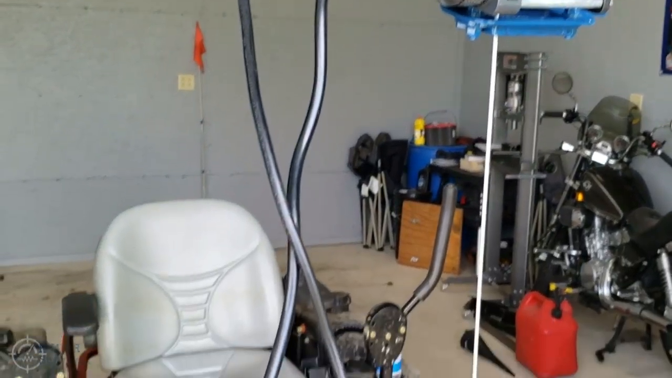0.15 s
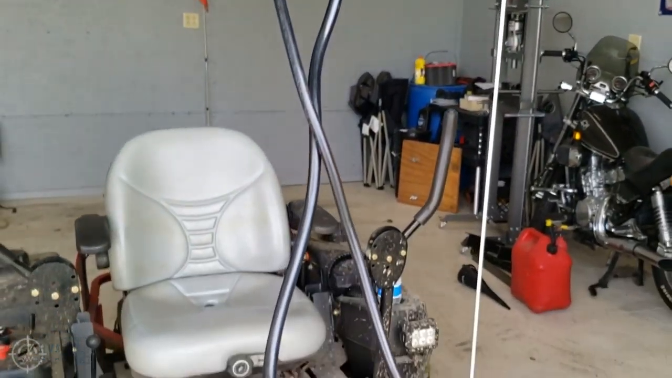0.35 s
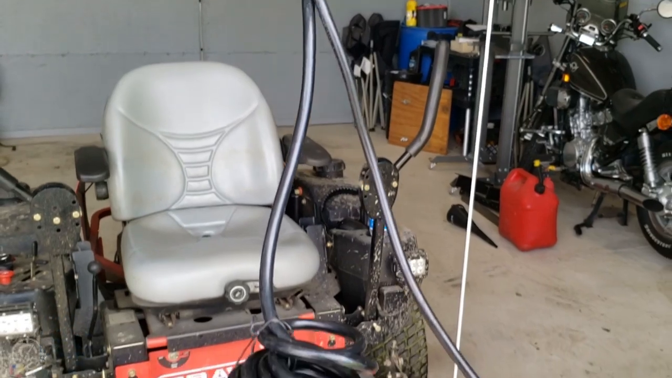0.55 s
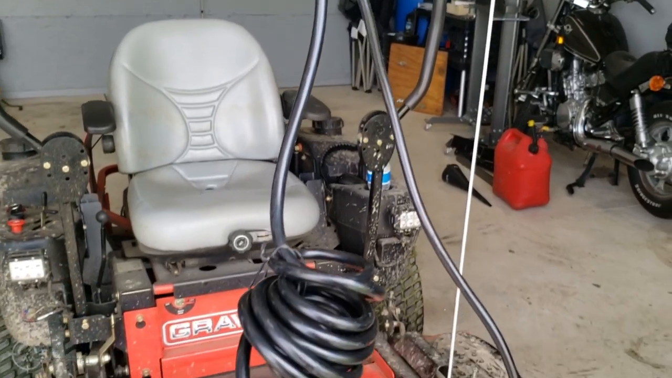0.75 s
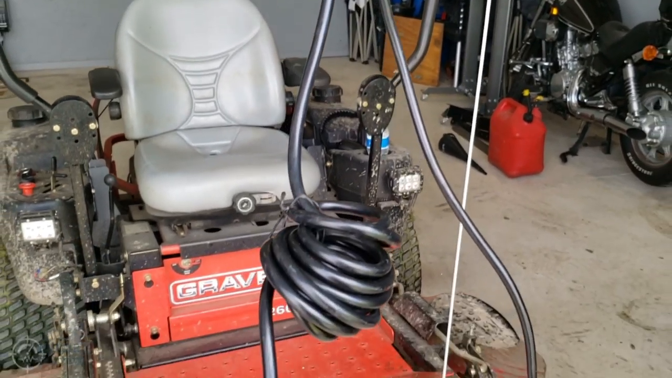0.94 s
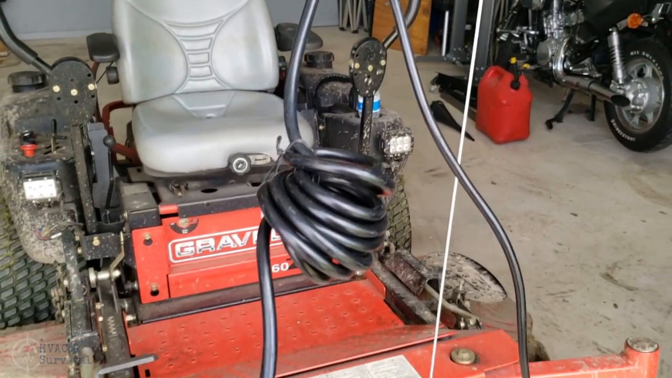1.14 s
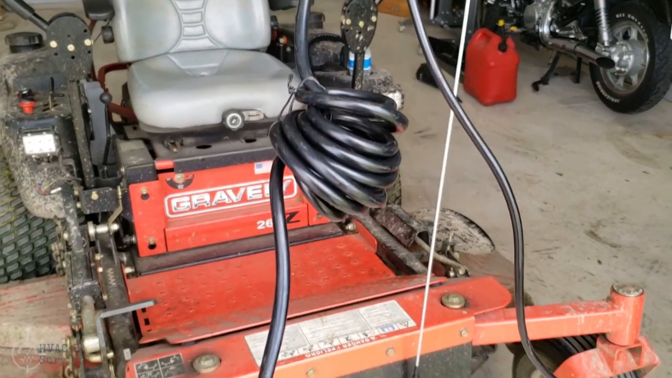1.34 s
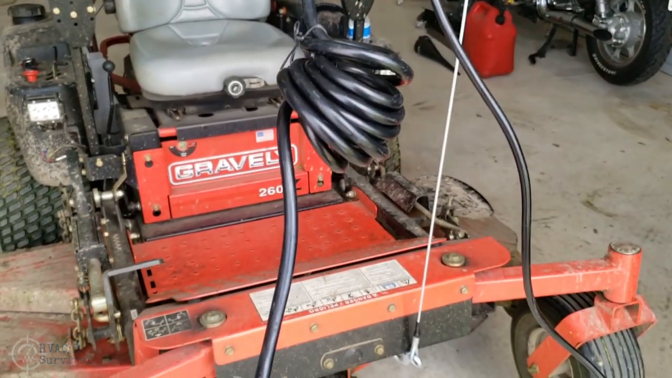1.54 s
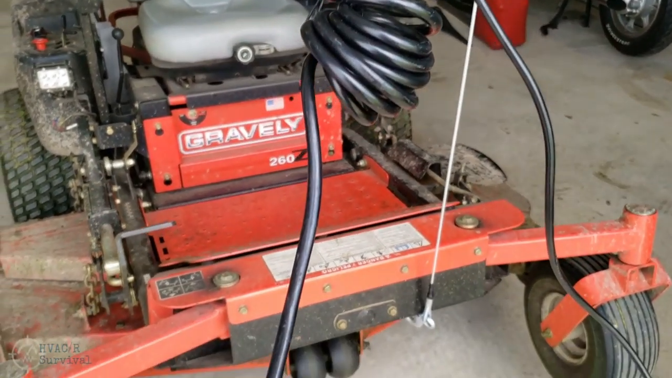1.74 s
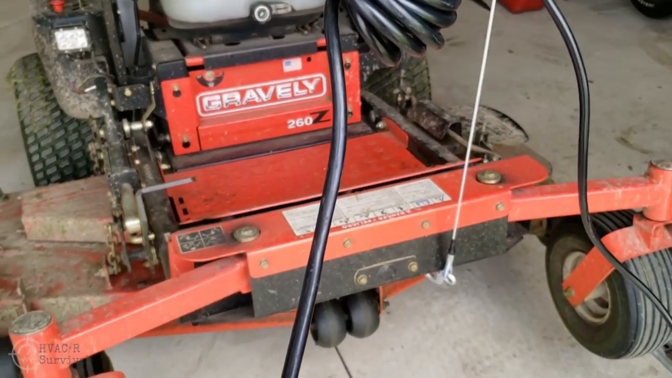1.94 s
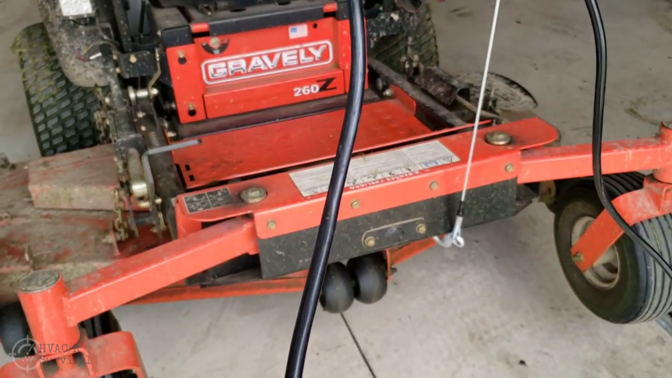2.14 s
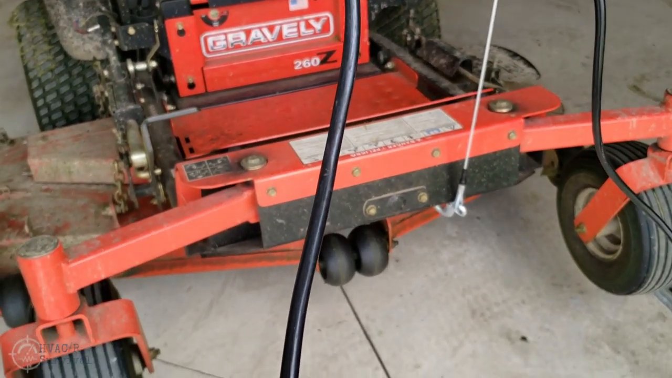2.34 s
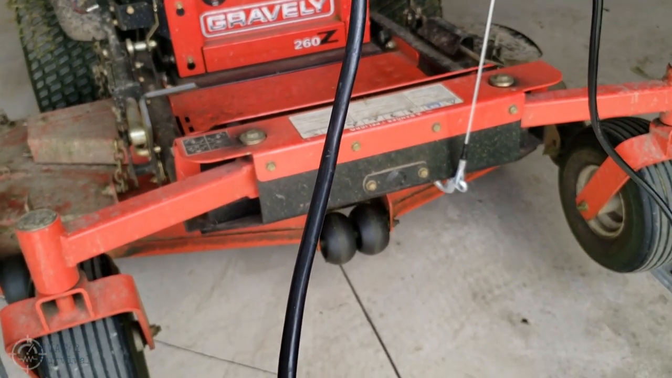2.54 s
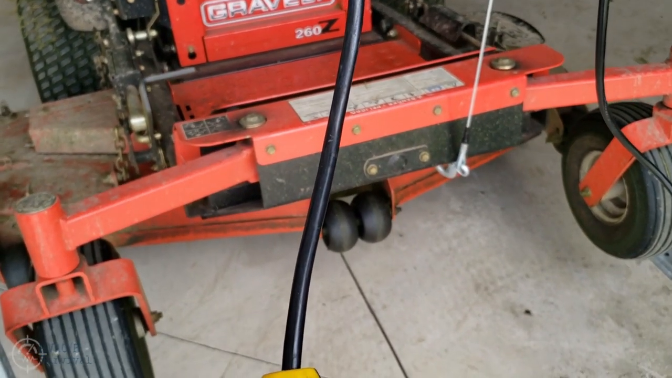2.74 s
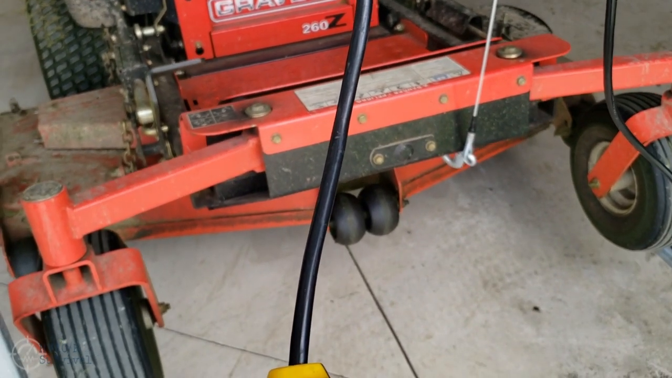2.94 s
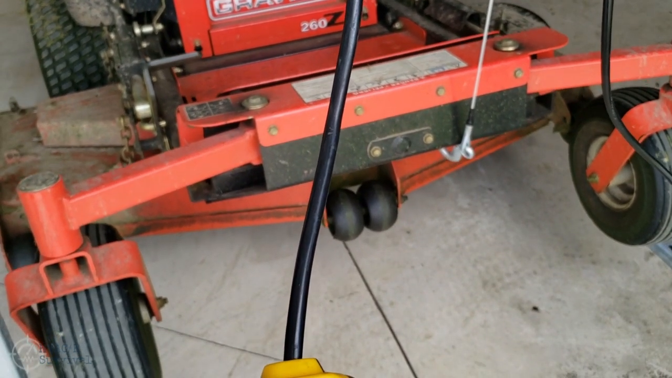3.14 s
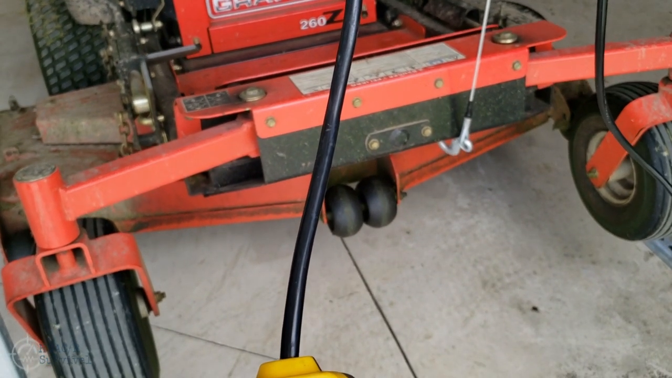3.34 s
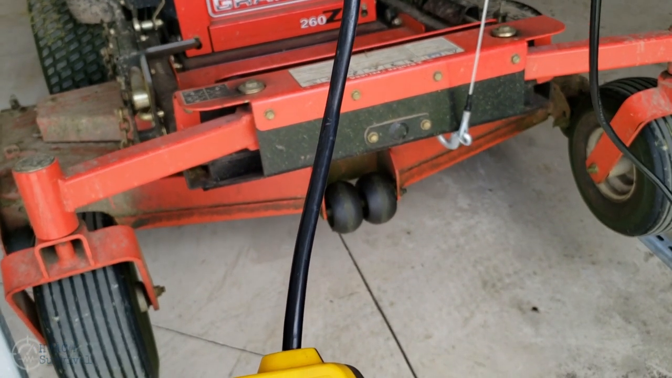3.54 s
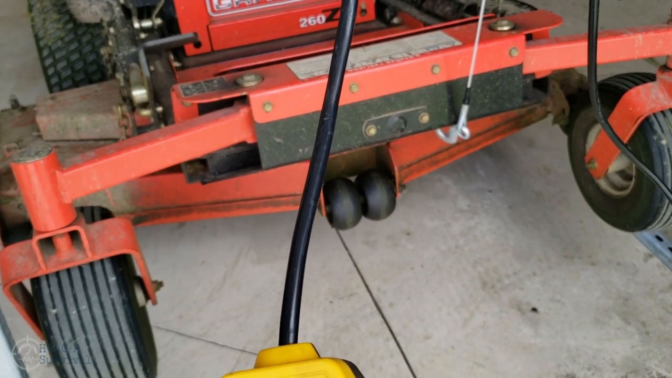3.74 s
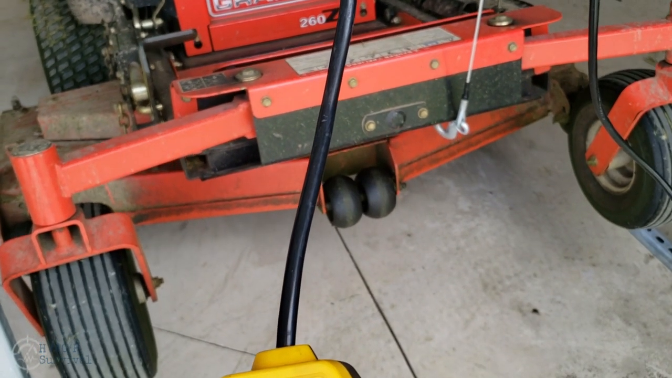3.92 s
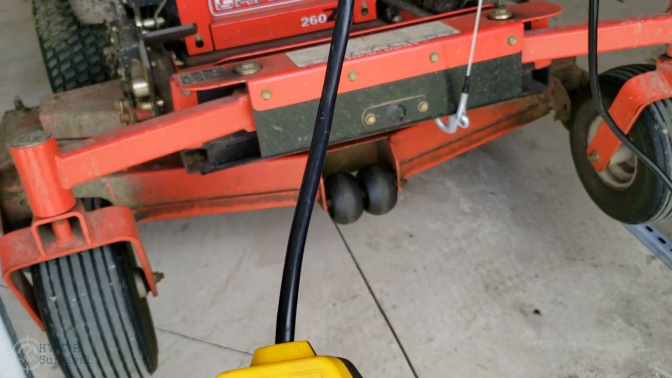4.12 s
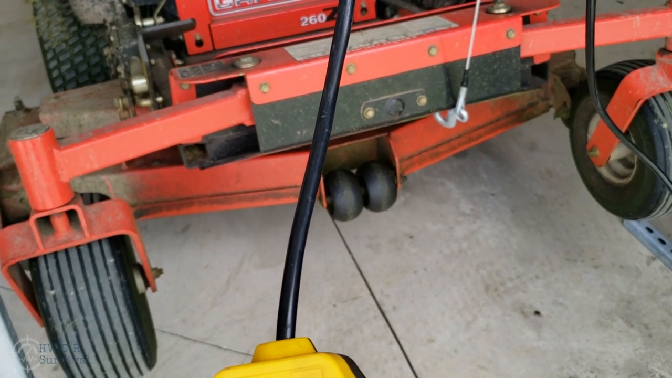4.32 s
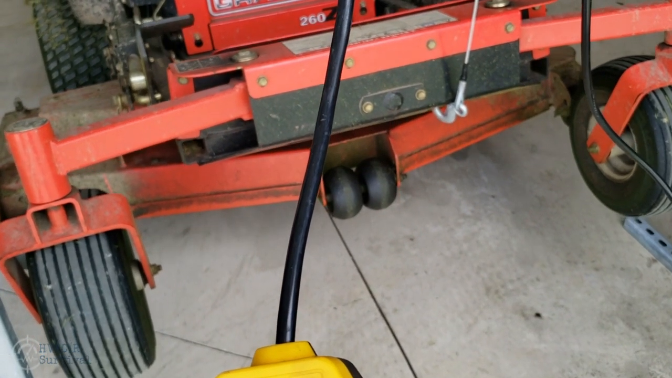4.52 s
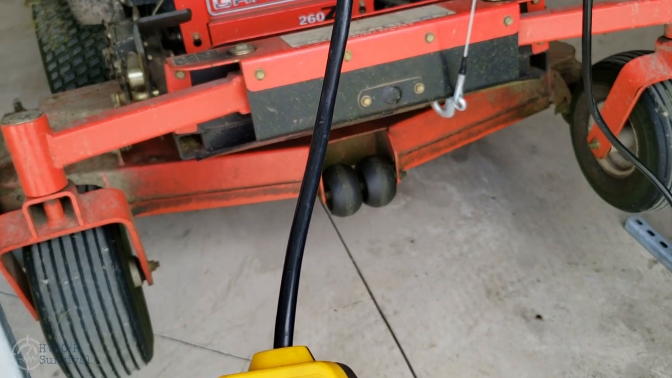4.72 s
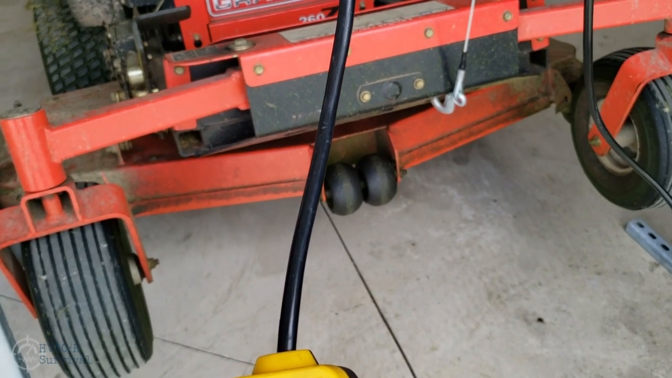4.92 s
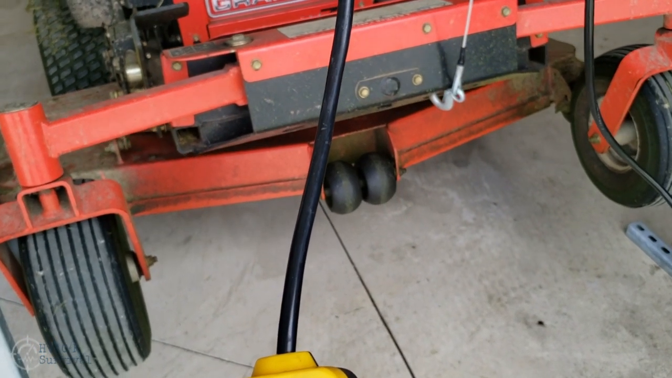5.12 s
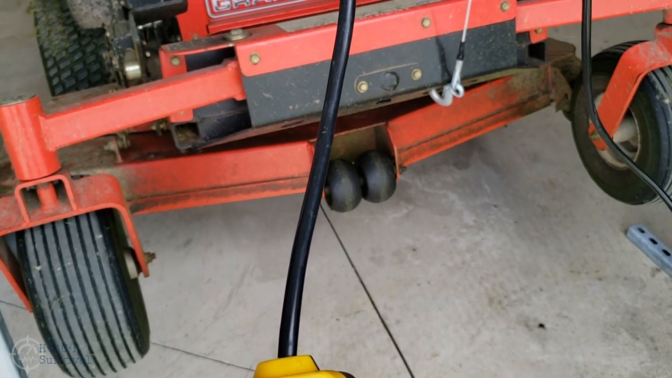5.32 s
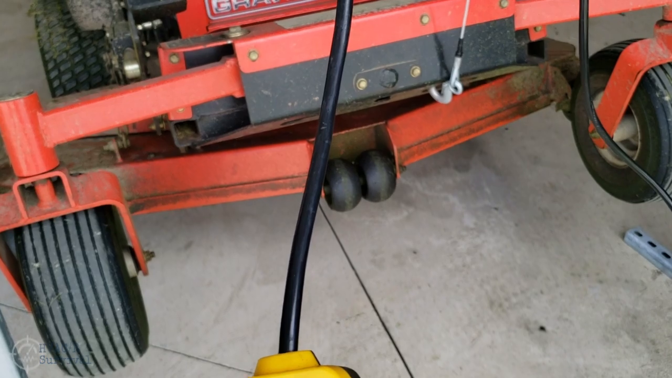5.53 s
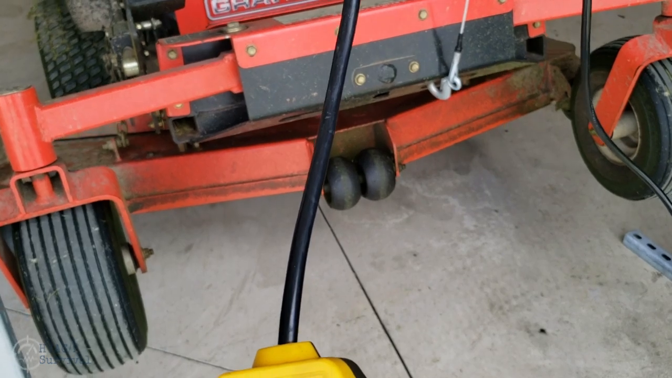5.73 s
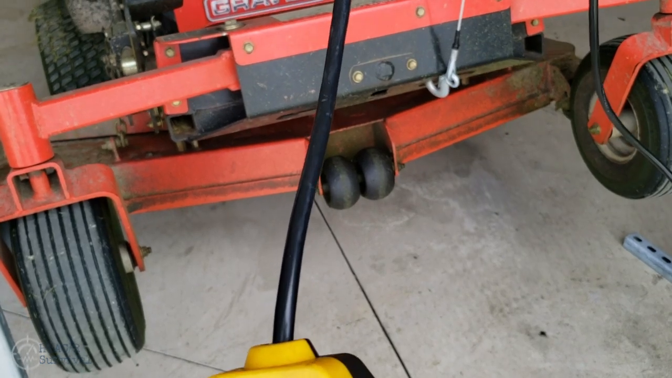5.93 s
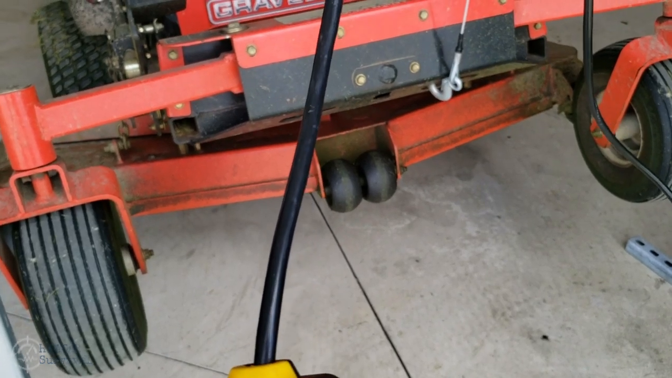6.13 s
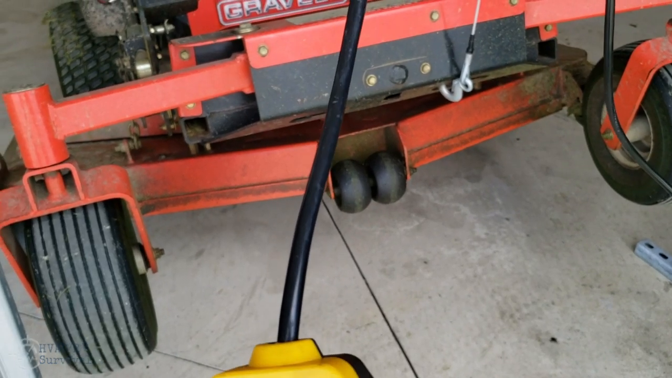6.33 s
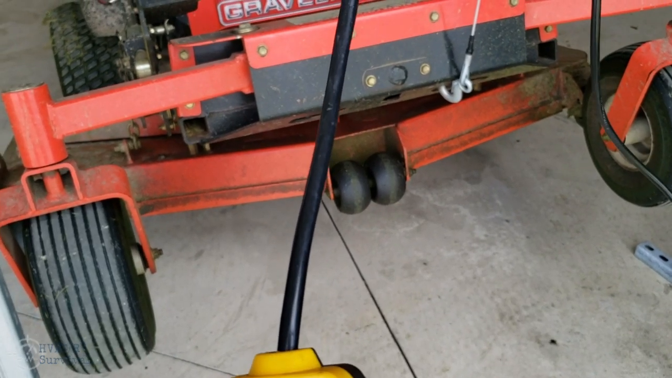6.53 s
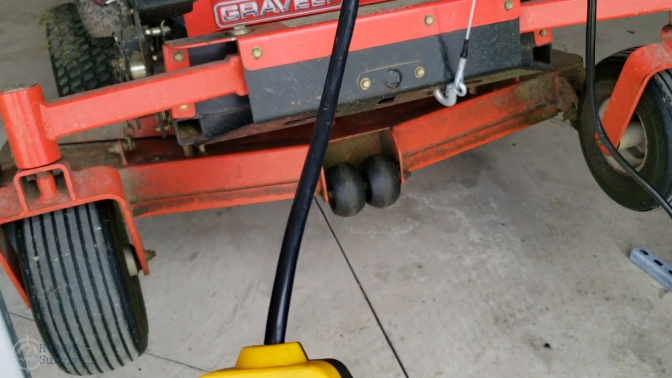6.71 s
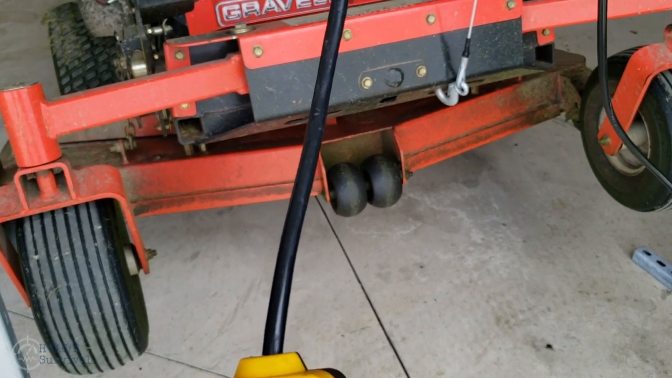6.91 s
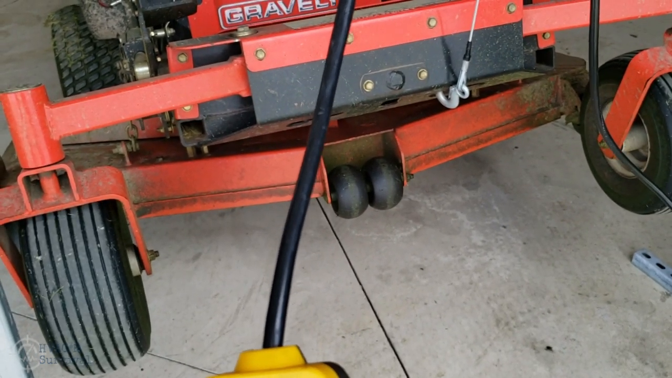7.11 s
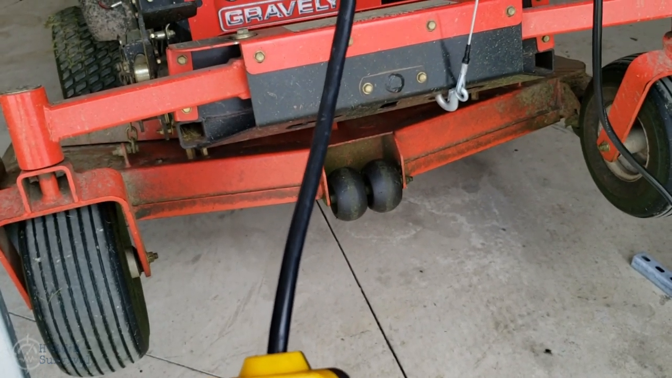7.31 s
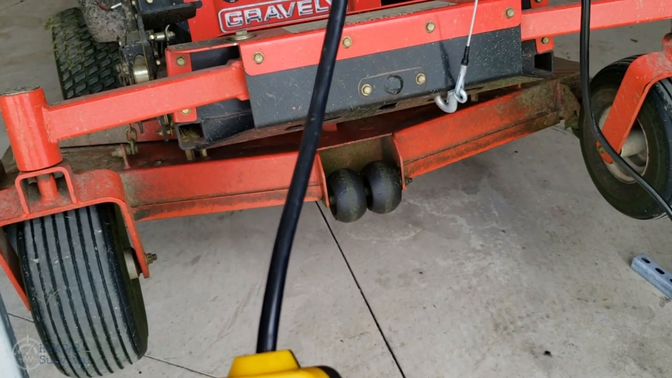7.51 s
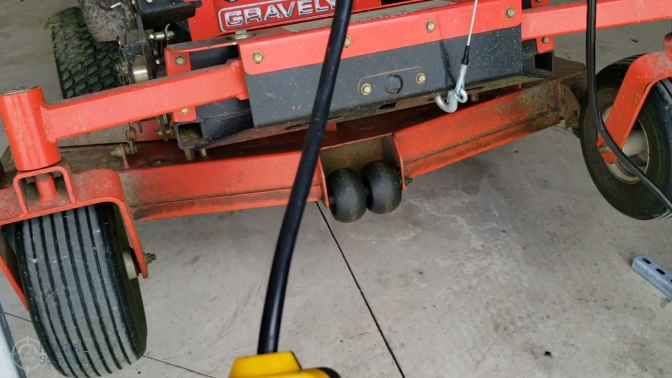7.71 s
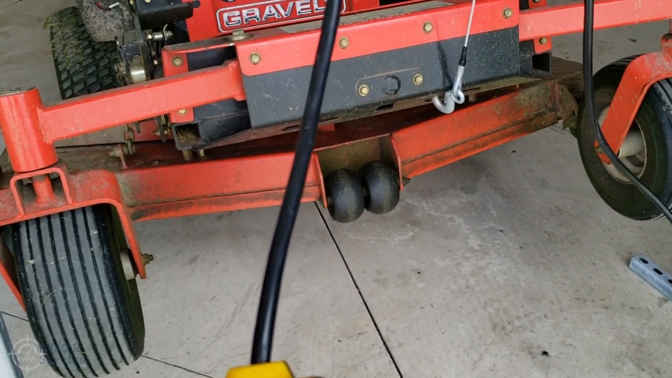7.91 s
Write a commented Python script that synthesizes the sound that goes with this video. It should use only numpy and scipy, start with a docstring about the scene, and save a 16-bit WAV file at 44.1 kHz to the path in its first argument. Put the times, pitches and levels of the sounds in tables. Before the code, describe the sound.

A hand-held stereo microphone hears a winch hauling a heavy load indoors: fluttering metallic whine, lower growl and hum, grinding noise and brush hiss. Cable clatters on the drum near the start. The tone fades, comes back coarse and wavering, then sags in pitch before a hard switch crack. The motor coasts for a blink, the garage reverberates, and a quiet floor remains with wind bumps on the left, faint ticks and an insect.

```python
"""A gear whine and a gritty rasp open the scene: an electric winch on a garage beam reels in steel cable
under load, heard from a hand-held microphone pair that turns away and partly back.
Gear teeth and brushes are gritty noise rung through housing resonances, gears and motor are wavering tones,
and the slipping cable is a rattle through the drum. The contactor snaps off, the motor coasts, the garage rings out,
and small sounds are left: wind on the left port, an insect, chirps, squeaks, knocks, a rustle and ticks."""
import sys
import numpy as np
from scipy import signal
from scipy.fft import rfft, irfft, next_fast_len
from scipy.io import wavfile

SR = 44100
rng = np.random.default_rng(int(sys.argv[2]) if len(sys.argv) > 2 else 0)


def persist_wave(psi):
    """Save psi, clipped to +-1, as 16-bit WAV."""
    counts = np.round(np.clip(psi, -1, 1) * 32767).astype(np.int16)
    wavfile.write(sys.argv[1], SR, np.atleast_2d(counts).T)


N = 355490
SIZE = next_fast_len(N + SR // 2)   # noise length in samples, with room to spare
HZ = np.maximum(np.arange(SIZE // 2 + 1) * SR / SIZE, 1)
STEP = 64   # samples between points of the slow curves
T, COARSE = np.arange(N) / SR, np.arange(0, N + STEP, STEP) / SR
SNAP_S, STOP_S = 5.858, 5.95   # the contactor snaps off; the motor has coasted to rest
CUTOFF_HZ = 15900


def amp(db):
    """dB to gain."""
    return 10 ** (np.asarray(db) / 20)


def rms_one(x):
    """Scaled so that the mean of the channels has rms 1."""
    return x / np.sqrt(np.mean(np.atleast_2d(x).mean(0) ** 2) + 1e-20)


def columns(rows, t=COARSE):
    """Curve columns read at the times t."""
    s, *values = np.transpose(rows)
    return [np.interp(t, s, v) for v in values]


def at_hz(points, hz=HZ):
    """A table read on a log-frequency axis."""
    table_hz, values = np.transpose(points)
    return np.interp(np.log(hz), np.log(table_hz), values)


def sides(lean_db):
    """Left and right gains for an L-R difference."""
    return amp(np.array([[.5], [-.5]]) * lean_db)


def drift(rate):
    """Slow chance with spread 1; a higher rate in Hz wanders faster."""
    r = np.exp(-2 * np.pi * rate * STEP / SR)
    raw = rng.standard_normal(len(COARSE) + 2000)
    slow = signal.lfilter([1], [1, -2 * r, r * r], raw)[2000:]   # past the filter's start
    return slow / slow.std()


def stereo_noise(likeness, lean_db, grit_db=0):
    """Spectrum of two-channel noise; grit lifts chance runs of eight samples so some contacts stand out."""
    sizes = np.minimum(rng.exponential(1, SIZE // 8 + 1), 4)
    grit = amp(grit_db * np.repeat(sizes, 8)[:SIZE])
    mid, side = rfft(rng.standard_normal((2, SIZE)) * grit)
    alike = np.clip(likeness, -.95, .95)
    pair = np.sqrt(1 + alike) * mid + np.sqrt(1 - alike) * side * [[1], [-1]]
    return pair * sides(lean_db)


def peak(hz, width_hz):
    """Gain of one resonance over frequency."""
    return 1 / (1 + 1j * (HZ ** 2 - hz ** 2) / (HZ * width_hz))


def band(low_hz, high_hz):
    """Gain of a band with soft edges."""
    return 1 / np.sqrt((1 + (low_hz / HZ) ** 8) * (1 + (HZ / high_hz) ** 8))


def filtered(spectrum, gain):
    """Back to time after a gain over frequency."""
    return irfft(spectrum * gain, SIZE)[..., :N]


def decay(s, t60):
    """Envelope that starts at s and dies away."""
    return (T >= s) * amp(-60 * np.maximum(T - s, 0) / t60)


def warble(hz, width_hz, clean):
    """A tone on a pitch track, part steady, part a narrow noise that differs between the channels."""
    wander = []
    for channel in range(2):
        wander.append(np.interp(T, COARSE, clean + drift(width_hz) + 1j * drift(width_hz)))
    carrier = np.exp(2j * np.pi * np.cumsum(hz) / SR)
    return rms_one(np.real(carrier * (np.array(wander) + 0.36 * wander[0])))


# How long the garage rings. Each row: frequency in Hz, t60 in s.
GARAGE_DECAY = [(100, 1.4), (300, 1.2), (700, 0.65), (2000, 0.76), (3200, .62), (5000, 0.55), (10000, 0.48),
                (16000, 0.35)]


def in_garage(gain, hz, end_s):
    """Envelope as heard: after the source ends, its sound dies with the decay of the garage at that pitch."""
    after = np.maximum(COARSE - end_s, 0)
    return np.interp(T, COARSE, gain * amp(-60 * after / at_hz(GARAGE_DECAY, hz)))


# Turning parts that throb the rasp. Each row: rate in Hz, depth as a share of the gain.
SHAFTS = [(20.5, 0.045), (41.6, .02), (63.5, 0.017), (6.22, 0.0082)]


def shaft_throb():
    """Gain that swells once a turn of each part, the timing wandering."""
    gain = 1
    for hz, depth in SHAFTS:
        turn = 2 * np.pi * hz * COARSE + 2.0 * drift(1.0) + rng.uniform(0, 2 * np.pi)
        gain = gain + depth * np.cos(turn)
    return gain


# Phase between the ports. Each row: frequency in Hz, lead of the left port in radians.
PORT_LEAD = [(0, 0), (2070, -.6), (3450, 2.9), (3790, 5.1), (5080, 4.3), (6460, 2.9), (7750, 2.7),
             (8180, 1.7), (10700, 5.2), (12400, 3.1), (13200, 8.1), (14400, 10.4), (15200, 15.6),
             (16500, 12.4)]


def port_lead():
    """Phase between the two ports for sound from the winch, split evenly over both."""
    return np.exp(1j * np.array([[.5], [-.5]]) * np.interp(HZ, *np.transpose(PORT_LEAD)))


# Housing resonances. Each row: frequency in Hz, width in Hz, level in dB at half facing and mean whine,
# rise in dB from facing away to facing the winch, rise in dB per dB of whine.
HOUSING = [(312.8, 7.5, -67.5, -2.5, .0), (397, 9.7, -61.5, -1.5, 0.28), (543, 15, -63.5, 16, 0.5),
           (745, 60, -52.5, 7, .0), (880, 110, -50.5, -10.5, -0.23), (1392, 120, -64, 26, 0.5),
           (2530, 35, -51, 0, 0.3), (2992, 110, -45.5, 2.5, 0.66), (2947, 22, -52.5, 0, .35),
           (4055, 60, -48.5, 2, 0.0), (3803, 30, -59, 0, 0), (6490, 42, -51.5, 3, .5),
           (11080, 130, -47, 12, -.2), (6030, 490, -52, 8, 0.59), (4170, 130, -49, 5, -0.1),
           (5098, 20, -50.5, 8, 0.1), (8840, 70, -56.5, -1.5, 0.8), (11830, 670, -42, 0.5, 0.34),
           (13300, 460, -52, 2, 0.4), (14600, 1600, -38, 0.5, 0.39)]


def housing(contacts, beat, facing, strain_db):
    """Each resonance of the housing rings with the contacts, driven ever less as the motor coasts."""
    coast_db = -57.5 * np.clip(COARSE - SNAP_S, 0, .12)   # dB per s, for the first 0.12 s
    out = 0
    for hz, width_hz, db, facing_db, per_strain in HOUSING:
        level_db = db + coast_db + facing_db * (facing - .5) + per_strain * strain_db
        gain = beat * amp(level_db + 1.8 * drift(2.2))
        out = out + rms_one(filtered(contacts, peak(hz, width_hz))) * in_garage(gain, hz, STOP_S)
    return out


# The running winch. Each row: time in seconds, mesh whine in dB, gear rasp in dB, brush hiss in dB,
# facing the winch from 0 to 1.
RUN = [(0.0, -23.5, -38.5, -33, 1), (.25, -25.5, -38.5, -31.5, 1), (.45, -27.5, -37, -31.5, 1),
       (.62, -35.5, -36, -28, 1), (1.0, -41, -36.5, -26.5, 1), (1.5, -50.5, -38.5, -29.5, 1),
       (1.85, -51, -39.5, -30, 0.51), (2.35, -37, -39, -32, 0.01), (2.6, -32.5, -36.5, -32, 0),
       (2.8, -26.5, -33.5, -30.5, 0), (3.05, -23.5, -35.5, -31.5, 0.27), (3.22, -27, -33, -31.5, 0.19),
       (3.5, -23, -34, -31, 0.4), (3.7, -28, -33.5, -29.5, 0.34), (3.95, -26.5, -34, -29, 0.45),
       (4.35, -29.5, -38, -28.5, 0.5), (4.75, -41, -39, -28.5, 0.28), (5.4, -40.5, -40.5, -30, 0.5),
       (5.6, -41, -37.5, -31, 0.29), (5.8, -38.5, -35.5, -32, 0.4), (5.86, -40.5, -35, -32.5, 0.8),
       (5.98, -40.5, -38, -38, 0.5)]
# Edges of the rumble, rasp, upper rasp and hiss, which share borders or leave gaps: one list [Hz].
RUN_EDGES_HZ = [100, 650, 1750, 2250, 7000, 16000]
# Colour of the contacts within those bands. Each row: frequency in Hz, relative level in dB per Hz.
RASP_COLOUR = [(53, -61), (90, -30), (234, -14.5), (467, -11), (593, -10.5), (1020, 1), (1380, -6),
               (1950, -2.5), (2270, -8.5), (3010, -13.5), (3450, -11.5), (4080, -11), (4700, -11),
               (5050, -10.5), (5600, -14), (7000, -7), (11600, -4.5), (16000, -7)]
# Stereo image of the winch. Each row: frequency in Hz, left-right likeness up to 1.
LIKENESS = [(60, 0.6), (130, .8), (290, .75), (640, 0.79), (1400, 0.55), (2500, 0.55), (4500, 0.42),
            (8000, 0.22), (15000, 0.27)]
# Balance of the winch. Each row: frequency in Hz, L-R difference in dB.
WINCH_LEAN = [(60, 5), (99, 14), (160, 5), (270, 2), (450, 6.5), (740, 4), (1220, 5), (2010, 2),
              (3330, -2.5), (5500, 6), (9080, -4), (15000, 4)]
RUMBLE_DB = -46.5
UPPER_RASP_DB, UPPER_PER_WHINE, UPPER_PER_HISS = -34, 0.16, 0.39   # mean in dB; dB per dB of whine and hiss


def winch():
    """Tooth and brush contacts as gritty noise, coloured band by band and rung through the housing."""
    whine_db, rasp_db, hiss_db, facing = columns(RUN)
    strain_db = whine_db - whine_db.mean()
    upper_db = UPPER_RASP_DB + UPPER_PER_WHINE * strain_db + UPPER_PER_HISS * (hiss_db - hiss_db.mean())
    levels_db = [RUMBLE_DB, rasp_db, upper_db, hiss_db]
    contacts = stereo_noise(at_hz(LIKENESS), at_hz(WINCH_LEAN), grit_db=1.8) * port_lead()
    rasp = contacts * amp(at_hz(RASP_COLOUR))

    # the noise's own level in each span is taken off, so the curves set the band levels
    edges = np.array(RUN_EDGES_HZ)
    spans = [edges[0:2], edges[1:3], edges[3:5], edges[4:6]]
    power = np.abs(rasp.mean(0)) ** 2
    offsets_db = [10 * np.log10(2 * power[(HZ > a) & (HZ < b)].sum() / SIZE ** 2) for a, b in spans]
    anchors = np.log([np.sqrt(a * b) for a, b in spans])

    centres, beat, out = np.geomspace(60, 15000, 13), shaft_throb(), 0
    for k, hz in enumerate(centres):
        mask = np.interp(np.log(HZ), np.log(centres), np.arange(len(centres)) == k)
        level_db = 0
        for j, (db, offset_db) in enumerate(zip(levels_db, offsets_db)):
            share = np.interp(np.log(hz), anchors, np.arange(len(spans)) == j)
            level_db = level_db + share * (db - offset_db)
        gain = beat * amp(level_db + 1.0 * drift(13.4) + 0.71 * drift(46))
        out = out + filtered(rasp, mask) * in_garage(gain, hz, STOP_S)
    return out + housing(contacts, beat, facing, strain_db)


# Throb of the gear tones. Each row: rate in Hz, depth at first, depth later (both before each tone's share),
# first swell in seconds.
WHINE_THROB = [(20.67, .55, .3, .0046), (41.34, .15, .3, .008), (62.01, .1, .17, .0074),
               (14.4, .18, .28, .003), (6.2, .15, .15, .07)]


def locked_throb(share, rough):
    """Gain that swells in step with the planet carrier; the depths shift and the beats slip as it roughens."""
    gain = 1
    for hz, first, later, first_s in WHINE_THROB:
        depth = share * (first + (later - first) * rough)
        # quicker beats slip further in phase [rad]
        slip = .35 * hz / WHINE_THROB[0][0] * (.5 + rough) * drift(.8)
        gain = gain + depth * np.cos(2 * np.pi * hz * (COARSE - first_s) + slip)
    return gain


# Gear tones, pitch sagging as the load grows. Each row: time in seconds, mesh whine in Hz, growl in Hz, hum in Hz.
GEAR_PITCH = [(0, 1986, 980, 1212), (.6, 2000, 987, 1236), (.9, 2015, 1005, 1240), (1.2, 2000, 1030, 1243),
              (2.5, 2006, 1032, 1240), (3.05, 1975, 1022, 1240), (3.2, 1962, 1018, 1200),
              (3.4, 1962, 1015, 1200), (3.55, 1985, 1015, 1200), (3.75, 2002, 1015, 1200),
              (4.2, 1992, 1012, 1200), (5.3, 1986, 1000, 1207), (5.5, 1960, 915, 1200),
              (5.62, 1950, 900, 1200), (5.66, 1890, 895, 1200), (5.82, 1860, 875, 1200),
              (5.98, 1840, 860, 1200)]
# Levels of the two lower gear tones. Each row: time in seconds, growl in dB, hum in dB.
GEAR_LEVELS = [(0.0, -52.5, -49.5), (.9, -47.5, -49), (1.15, -48, -39.5), (1.6, -42.5, -48),
               (2.2, -42, -43.5), (2.65, -33.5, -44), (2.85, -38.5, -38), (3.1, -43.5, -50),
               (3.4, -48, -41.5), (3.6, -44, -53.5), (4.75, -37, -51), (5.2, -40, -53), (5.46, -42, -32),
               (5.7, -42.5, -75), (5.98, -60, -41)]
# The whine flares as the cable tightens. Each row: centre in seconds, half length in s, rise in dB.
SURGES = [(5.665, 0.016, 10), (5.72, .015, 5), (5.77, 0.014, 6), (5.819, 0.016, 13)]


def whine():
    """Gear tones throb with the planet carrier and are cut when the drive stops."""
    surge_db = sum(db * np.exp(-((COARSE - s) / half) ** 2) for s, half, db in SURGES)
    whine_db = columns(RUN)[0] + surge_db + 1.2 * drift(6.3)
    levels_db = [whine_db] + columns(GEAR_LEVELS)
    rough = np.interp(COARSE, [.8, 2.5], [0, 1])   # the tones roughen between these seconds
    steadiness = 1 - .55 * rough
    # whine, growl, hum: width in Hz, steady part, L-R in dB, share of the throb, end in seconds
    voices = [(38, 2.1, 1.2, .95, SNAP_S),
              (25, 1.9, 2.6, .7, STOP_S),
              (6.05, 2.6, 8.5, 0.47, STOP_S)]
    out = 0
    for hz, db, voice in zip(columns(GEAR_PITCH, T), levels_db, voices):
        width_hz, clean, lean_db, throb_share, end_s = voice
        beat = rms_one(locked_throb(throb_share, rough))
        # the steadiness is slow, so it is set on the coarse grid inside the tone
        tone = warble(hz, width_hz, clean * steadiness)
        out = out + tone * in_garage(beat * amp(db), hz.mean(), end_s) * sides(lean_db)
    return out


# Motor tones. Each row: time in seconds, hum in Hz, hum in dB, octave in dB, undertone in dB.
MOTOR = [(0, 240, -60, -55, -74), (.9, 237.4, -52.5, -51.5, -69), (1.5, 242, -63.5, -62.5, -63.5),
         (2.1, 239.2, -56, -49.5, -66), (2.7, 242.8, -54.5, -46.5, -56), (3.0, 240.2, -62, -59, -62),
         (4.0, 237.6, -65, -58.5, -64), (5.0, 237.7, -58, -52.5, -70), (5.6, 229.4, -61, -55, -74.5),
         (5.98, 224, -68, -63, -68)]
# Pitch of hum, octave and undertone: one list [multiples of the hum].
MOTOR_ORDERS = [1, 2, .685]


def motor():
    """The low hum of the motor with its octave and an undertone, each a narrow wavering tone."""
    hz, levels_db = columns(MOTOR, T)[0], columns(MOTOR)[1:]
    out = 0
    for order, db in zip(MOTOR_ORDERS, levels_db):
        envelope = in_garage(amp(db), order * hz.mean(), STOP_S)
        out = out + warble(order * hz, 4, clean=3) * envelope * sides(4)
    return out


# Colour of the floor. Each row: frequency in Hz, relative level in dB per Hz.
QUIET_COLOUR = [(90, -28), (130, -7), (300, -17), (470, -21.5), (700, -21), (940, -21.5), (1300, -22),
                (2200, -27.5), (3000, -31), (7300, -39.5), (12000, -33.5), (16000, -38)]
# Balance of the floor. Each row: frequency in Hz, L-R difference in dB.
QUIET_LEAN = [(60, 2), (180, 3.5), (550, 13), (1650, -1.5), (4970, 2), (15000, -2)]
QUIET_DB = -77.5


def quiet():
    """The floor of garage and microphone: coloured noise that wavers slightly."""
    noise = stereo_noise(.5 * band(0.62, 500) - .02, at_hz(QUIET_LEAN))
    floor = rms_one(filtered(noise, amp(at_hz(QUIET_COLOUR))))
    return amp(QUIET_DB) * floor * np.interp(T, COARSE, amp(0.98 * drift(3.9)))


# Gusts that thud on the port. Each row: time in seconds, level in dB.
PUFFS = [(1.177, -67), (1.396, -67), (2.139, -64), (2.419, -60), (2.697, -72), (3.32, -64), (3.655, -61),
         (3.941, -59), (4.725, -56), (5.207, -65), (5.388, -65), (5.596, -60), (6.45, -65), (6.633, -52.5),
         (6.71, -57.5), (7.111, -64), (7.374, -58), (7.584, -40.5), (7.85, -56), (7.94, -55.5)]
WIND_DB, WIND_AFTER_DB = -75.5, -64   # it freshens towards the end
SMALL_PUFF_COUNT, SMALL_PUFF_DB = 18, -67   # mean level of the chance puffs


def wind():
    """Lumpy low noise and single thuds of air, mostly in the left port."""
    lumps = rms_one(filtered(stereo_noise(.3, 13), peak(65, 60) * band(24, 110)))
    level_db = np.interp(COARSE, [5.4, 6.5], [WIND_DB, WIND_AFTER_DB])
    out = lumps * np.interp(T, COARSE, amp(level_db + 5.3 * drift(6)))
    chances = rng.random((SMALL_PUFF_COUNT, 2))
    small_puffs = [(place * N / SR, SMALL_PUFF_DB + 5.4 * (size - .5)) for place, size in chances]
    for s, db in small_puffs + PUFFS:
        hz, phase = 66 + 9 * rng.standard_normal(), rng.uniform(0, 2 * np.pi, (2, 1))
        swell = np.exp(-((T - s - .02) / .019) ** 2)   # a thud lasts two or three swings
        out = out + amp(db) * swell * np.sin(2 * np.pi * hz * T + phase) * sides(20)
    return out


# Cable slips on the drum, the last as the brake bites. Each row: start in seconds, length in s, level in dB.
SLIPS = [(0.93, 0.033, -21), (1.081, 0.06, -20), (1.136, 0.05, -24.5), (1.19, 0.17, -34),
         (5.927, 0.052, -33)]
# Drum resonances. Each row: frequency in Hz, width in Hz, relative level in dB.
DRUM = [(1254, 39, -2.5), (1435, 32, 5.5), (1840, 24, -4.5), (3200, 183, -3.5), (3770, 54, -10),
        (431.6, 67, -12)]


def slips():
    """Short rattles of dense uneven clicks ring the drum, over a broad scrape."""
    colour = amp(-11.0) * band(1400, 4700)
    for k, (hz, width_hz, db) in enumerate(DRUM):
        colour = colour + amp(db) * (-1) ** k * peak(hz, width_hz)
    rattle = rms_one(filtered(stereo_noise(.6, 2.5, grit_db=4.2), colour))
    gain = 0
    for s, length, db in SLIPS:
        during = (COARSE > s) * (COARSE < s + length)
        gain = gain + amp(db) * during * (1 - 0.44 * (COARSE - s) / length)
    r = amp(-60 * STEP / SR / 0.07)   # the drum rings on briefly, t60 0.07 s
    return rattle * np.interp(T, COARSE, signal.lfilter([1 - r], [1, -r], gain))


# Soft bumps nearby. Each row: start in seconds, level in dB, t60 in s.
BUMPS = [(5.58, -44.5, 0.23), (5.856, -54, 0.3), (7.36, -51.5, 0.86), (7.59, -52, 0.17)]
# Body of a bump. Each row: frequency in Hz, relative level in dB.
BUMP_BODY = [(125, 7), (200, -2), (300, -23)]
# The hanging load sways and knocks faintly. Each row: start in seconds, level in dB, pitch factor.
KNOCKS = [(6.49, -77, 1.0), (6.72, -82, 1.09), (6.94, -77, 1.0), (7.19, -81, 1.09), (7.38, -73, 1.0),
          (7.6, -79, 1.09), (7.865, -75, 1.0)]
# Resonances of a knock. Each row: frequency in Hz, level in dB on top of the knock, t60 in s, L-R difference in dB.
KNOCK_BODY = [(747, -8, 0.8, 13), (932, -4, 0.99, 12.5), (1718, -6.5, 0.26, 16), (2850, -6, .24, -2.5),
              (2000, -9, 0.203, 3)]
# Faint ticks. Each row: start in seconds, level at the onset in dB, lowest frequency in Hz.
TICKS = [(6.61, -82, 2000), (6.86, -79, 2000), (7.786, -65, 6500), (7.797, -56.5, 4000), (7.864, -67, 900),
         (7.869, -54, 900)]
# Colour of the rustle. Each row: frequency in Hz, relative level in dB per Hz.
RUSTLE_COLOUR = [(1000, -23), (1600, 0), (3000, 2), (3600, -14), (4600, -1.5), (7000, -12), (9000, -20),
                 (13000, -10), (16000, -13.5)]
RUSTLE_S, RUSTLE_DB, RUSTLE_T60_S = 7.8, -60, .55


def small_sounds():
    """Bumps, knocks and a rustle swell softly in their resonances, ticks are bursts of bright noise."""
    noise = stereo_noise(0.36, 0)
    body = sum(amp(db) * peak(hz, 60.6) ** 2 for hz, db in BUMP_BODY)
    thud = rms_one(filtered(noise, body))
    # a fast decay taken from a slow one gives a soft start
    bumps = sum(amp(db) * (decay(s, t60) - decay(s, 0.058)) for s, db, t60 in BUMPS)
    out = thud * bumps * sides(6.7)
    for hz, level_db, t60, lean_db in KNOCK_BODY:
        for s, db, pitch in KNOCKS:
            ring = rms_one(filtered(noise, peak(hz * pitch, 70) ** 2)) * sides(lean_db)
            out = out + ring * amp(db + level_db) * (decay(s, t60) - decay(s, 0.035))
    for s, db, low_hz in TICKS:
        bright = rms_one(filtered(noise, band(low_hz, CUTOFF_HZ)))
        out = out + amp(db) * decay(s, .013) * bright * sides(3)
    rustle = rms_one(filtered(stereo_noise(.36, 0, grit_db=1.0), amp(at_hz(RUSTLE_COLOUR)))) * sides(1.8)
    return out + amp(RUSTLE_DB) * rustle * (decay(RUSTLE_S, RUSTLE_T60_S) - decay(RUSTLE_S, .3))


# Colour of the crack. Each row: frequency in Hz, relative level in dB per Hz.
SNAP_COLOUR = [(71, -26.5), (200, -6.5), (600, -25.5), (1290, -1), (2300, 4), (3400, -7), (5500, -15.5),
               (7000, -1), (9000, -16), (11500, -0.5), (14500, -3), (16000, -30)]
# Balance of the crack. Each row: frequency in Hz, L-R difference in dB.
SNAP_LEAN = [(60, 1), (950, 3), (3770, 4), (15000, 13.5)]
# Steel set ringing by the stop, with a close pair beating.
# Each row: frequency in Hz, level in dB, t60 in s, flutter in Hz.
FRAME = [(543, -64, 4.2, 12), (517, -68, 3.8, 12), (1411, -59, 2.4, 14), (1413.86, -62, 2.4, 14),
         (1205, -49, .45, 8), (1367, -55, 1.0, 14), (1820, -62, 1.2, 14)]
SNAP_DB, SNAP_T60_S, SNAP_RISE_S = -8, .018, .004
THUMP_HZ, THUMP_DB, THUMP_T60_S = 205, -34, .04


def stop():
    """The contactor cracks, its box thumps and the steel frame rings on, fluttering."""
    crack = rms_one(filtered(stereo_noise(.85, at_hz(SNAP_LEAN)), amp(at_hz(SNAP_COLOUR))))
    out = amp(SNAP_DB) * crack * (decay(SNAP_S, SNAP_T60_S) - decay(SNAP_S, SNAP_RISE_S))
    thump = decay(SNAP_S, THUMP_T60_S) * np.sin(2 * np.pi * THUMP_HZ * (T - SNAP_S))
    out = out + amp(THUMP_DB) * thump * sides(3)
    for hz, db, t60, width_hz in FRAME:
        ring = warble(np.full(N, hz), width_hz, clean=2.5)
        out = out + amp(db) * decay(SNAP_S, t60) * ring * sides(5.5)
    return out


# Faint far chirps. Each row: start in seconds, length in s, level in dB, glide in Hz.
CHIRPS = [(6.286, 0.055, -69, 79), (6.383, .075, -73.5, 151), (6.71, 0.2, -90, -40),
          (7.104, 0.13, -76, -110), (7.23, .15, -88, 0), (7.57, 0.14, -89, -40), (7.98, 0.11, -85.5, 40)]
# Thin squeaks. Each row: start in seconds, length in s, middle pitch in Hz, glide in Hz, level in dB, width in Hz,
# L-R difference in dB.
SQUEAKS = [(7.08, .36, 4250, 300, -96, 40, 1), (7.15, .35, 2010, -30, -89, 30, 0),
           (7.69, .3, 12400, -300, -75, 700, 8)]
CHIRP_HZ = 2470
INSECT_HZ, INSECT_WIDTH_HZ, INSECT_THROB_HZ, INSECT_DB = 6550, 700, 13.5, -82.5


def faint_tones():
    """Squeaks and far chirps are gliding, trembling tones; an insect on the left is throbbing narrow noise."""
    out = 0
    chirps = [(s, length, CHIRP_HZ, glide_hz, db, 30, -1.5) for s, length, db, glide_hz in CHIRPS]
    for s, length, middle_hz, glide_hz, db, width_hz, lean_db in chirps + SQUEAKS:
        along = np.clip((T - s) / length, 0, 1)
        tremble_hz = .4 * width_hz * np.interp(T, COARSE, drift(60))
        hz = middle_hz + glide_hz * (along - .5) + tremble_hz
        fade = np.clip(6.7 * along, 0, 1) * np.clip(4.1 * (1 - along), 0, 1)
        out = out + warble(hz, width_hz, clean=.8) * amp(db) * fade * sides(lean_db)
    song = rms_one(filtered(stereo_noise(0.26, 12), peak(INSECT_HZ, INSECT_WIDTH_HZ) ** 2))
    pulses = 1 + .45 * np.cos(2 * np.pi * INSECT_THROB_HZ * T + 1.5)
    # the song swells to its full level at 7.53 s, steeply until 7.43 s (slopes in dB per s)
    song_db = INSECT_DB - 23 * np.maximum(7.53 - T, 0) - 86.5 * np.maximum(7.43 - T, 0)
    return out + song * pulses * amp(song_db)


def scene():
    """All sources at the two ports."""
    running = winch() + whine() + motor()
    around = quiet() + wind() + small_sounds() + faint_tones()
    return running + slips() + stop() + around


def record(dry):
    """The top is cut by a steep low-pass."""
    return signal.sosfilt(signal.ellip(14, .2, 54, CUTOFF_HZ, fs=SR, output="sos"), dry)


dry = scene()
out = record(dry)
persist_wave(out)
```